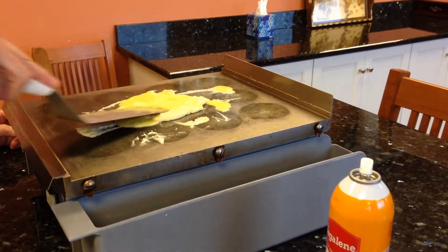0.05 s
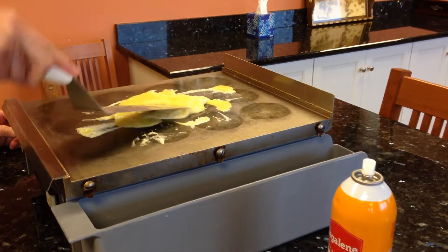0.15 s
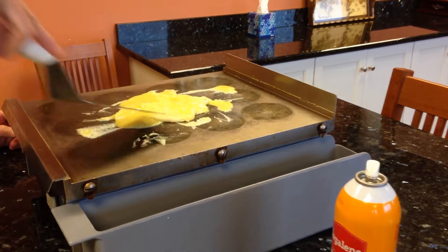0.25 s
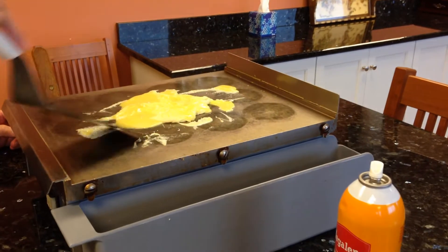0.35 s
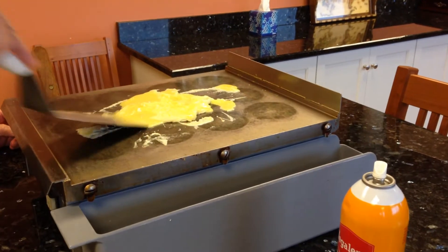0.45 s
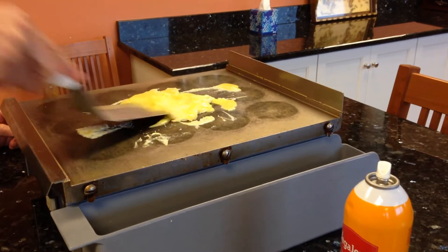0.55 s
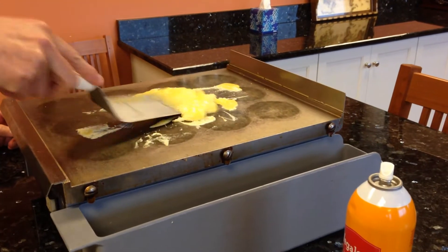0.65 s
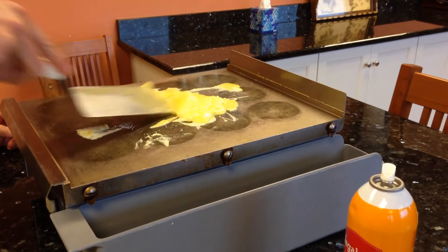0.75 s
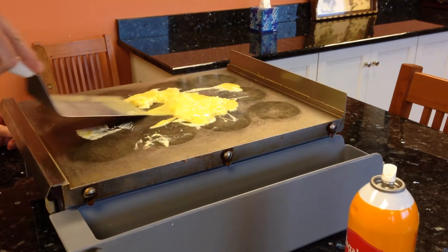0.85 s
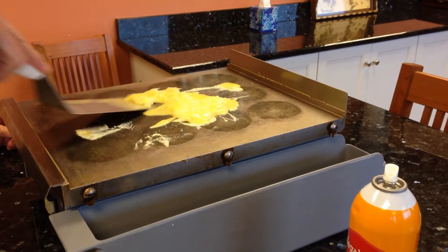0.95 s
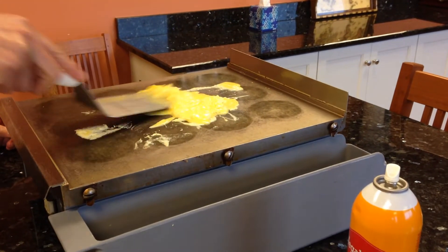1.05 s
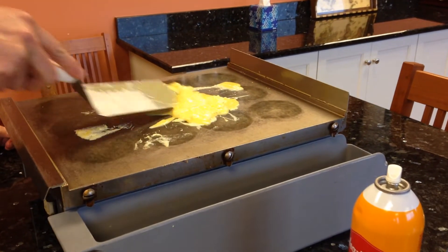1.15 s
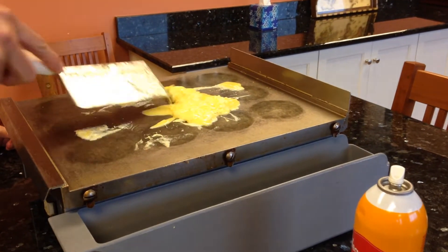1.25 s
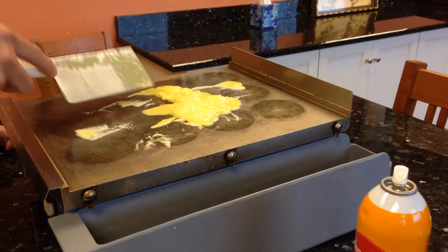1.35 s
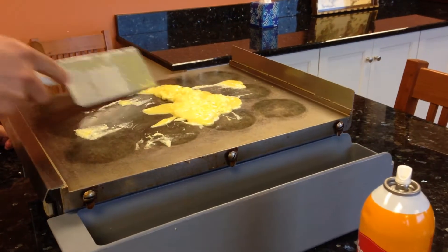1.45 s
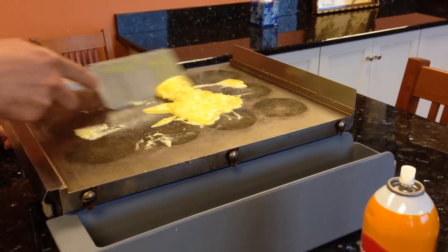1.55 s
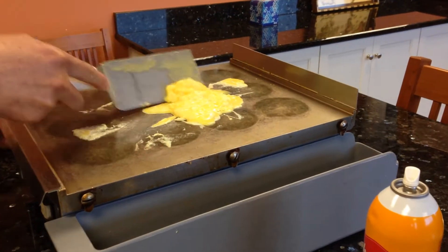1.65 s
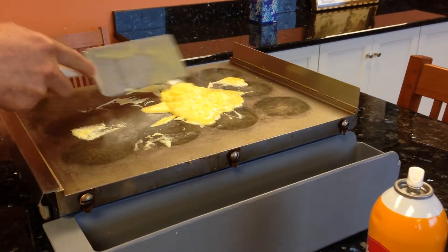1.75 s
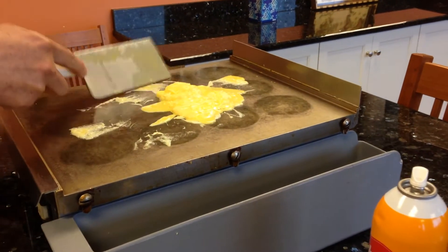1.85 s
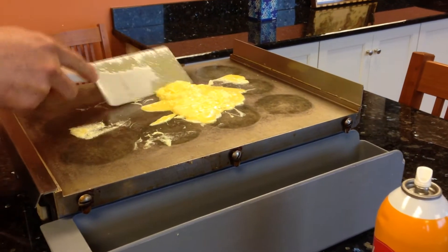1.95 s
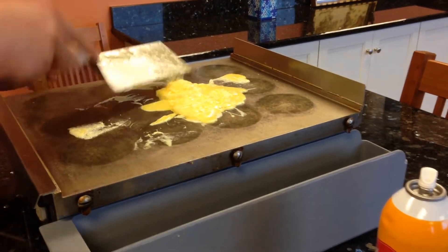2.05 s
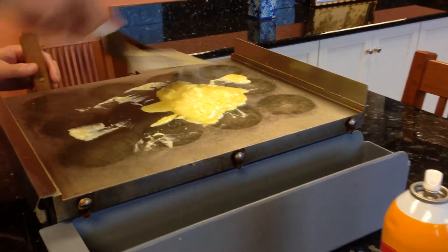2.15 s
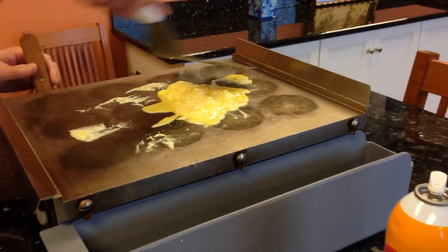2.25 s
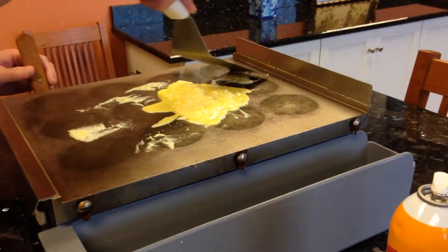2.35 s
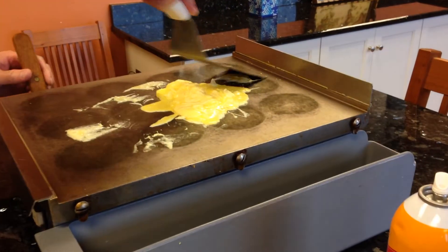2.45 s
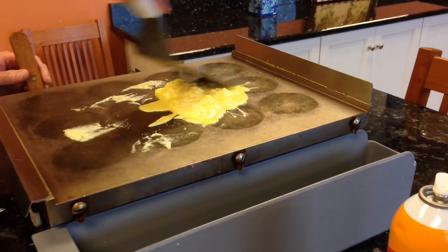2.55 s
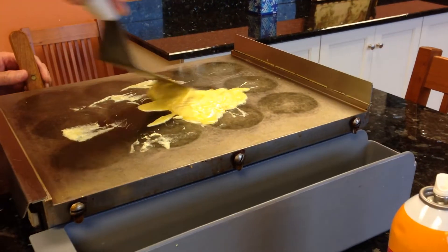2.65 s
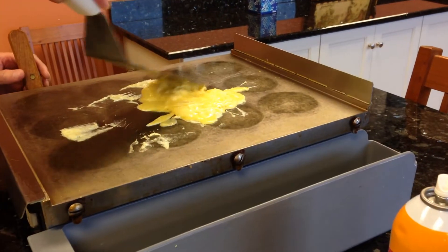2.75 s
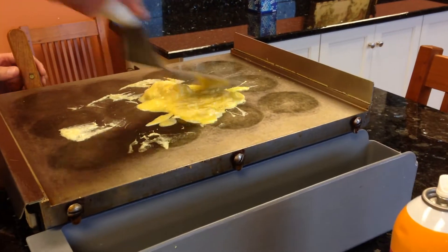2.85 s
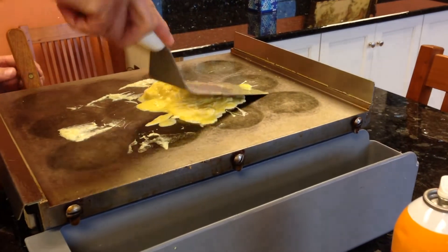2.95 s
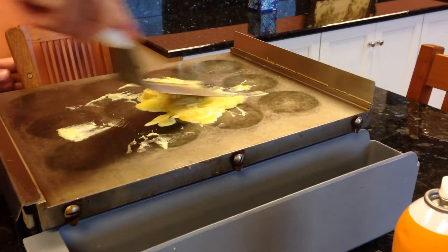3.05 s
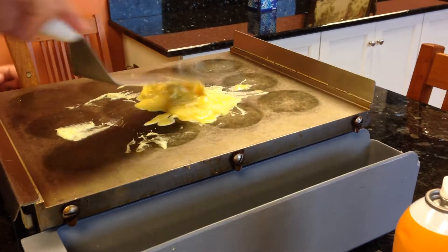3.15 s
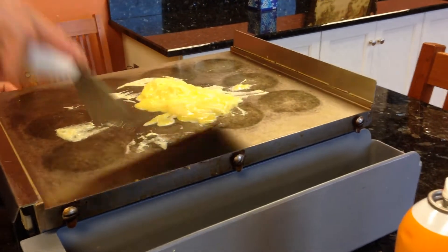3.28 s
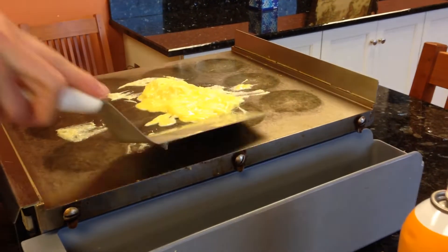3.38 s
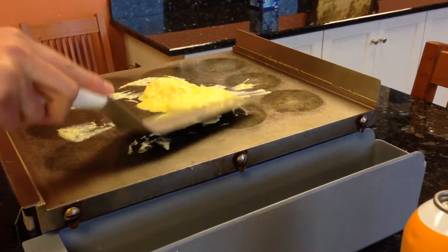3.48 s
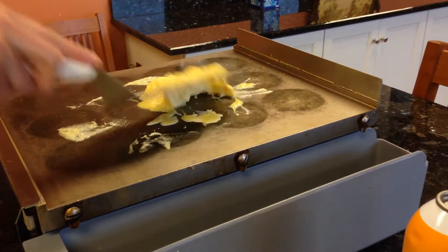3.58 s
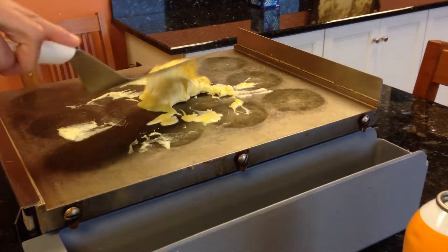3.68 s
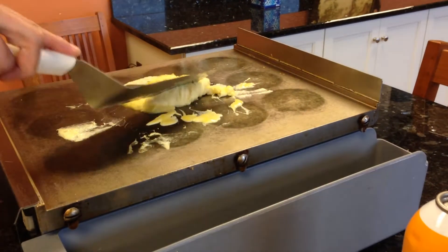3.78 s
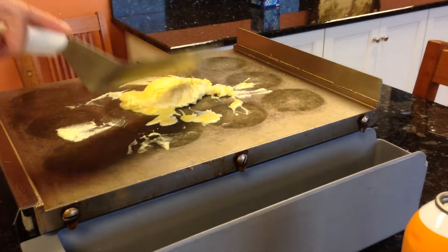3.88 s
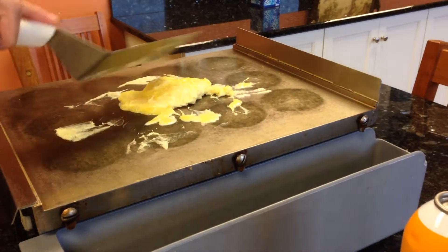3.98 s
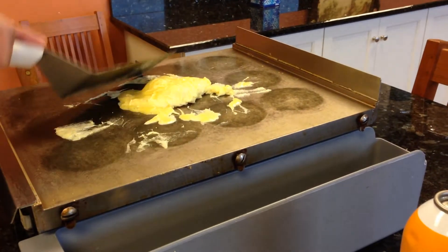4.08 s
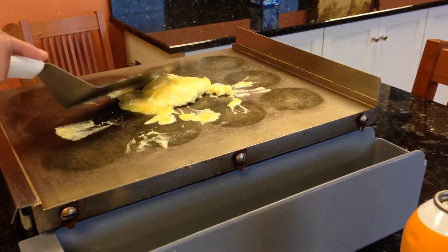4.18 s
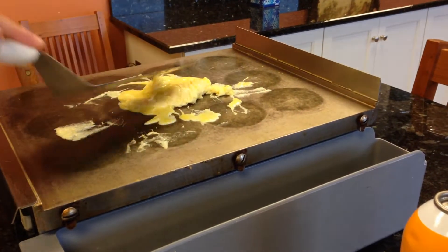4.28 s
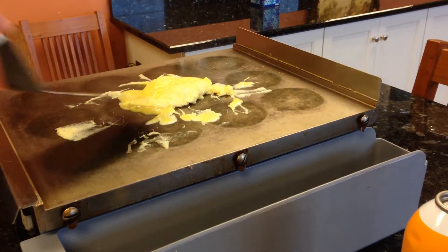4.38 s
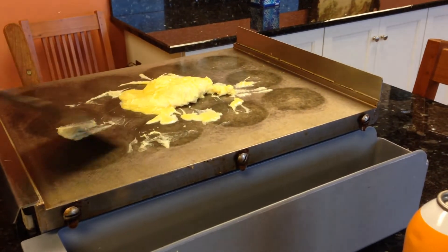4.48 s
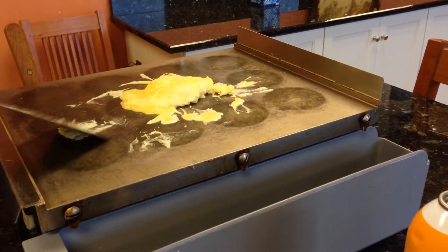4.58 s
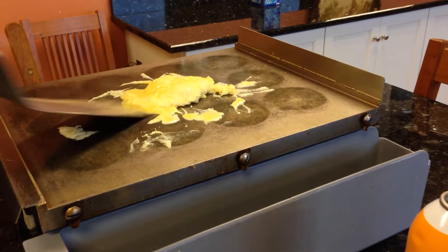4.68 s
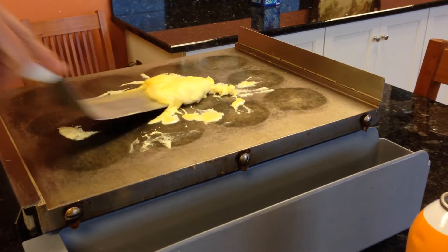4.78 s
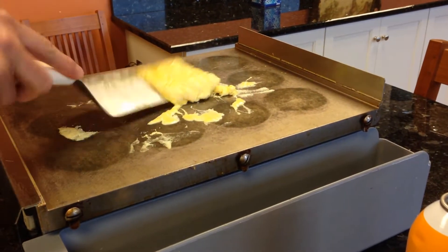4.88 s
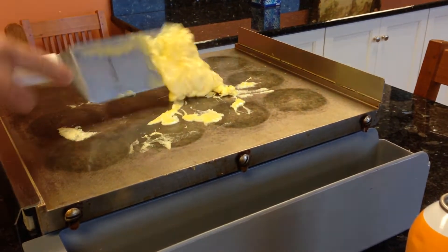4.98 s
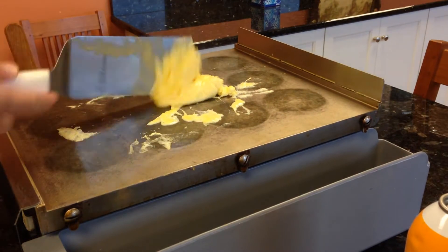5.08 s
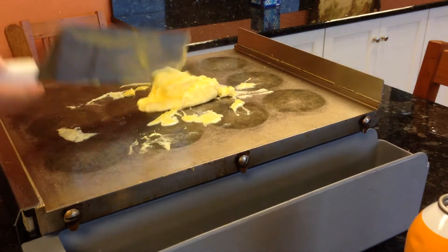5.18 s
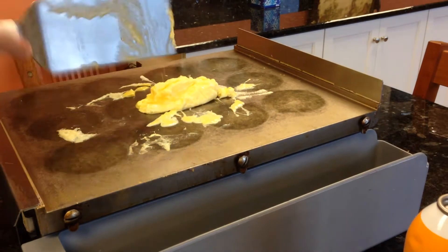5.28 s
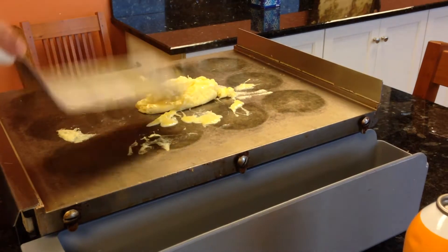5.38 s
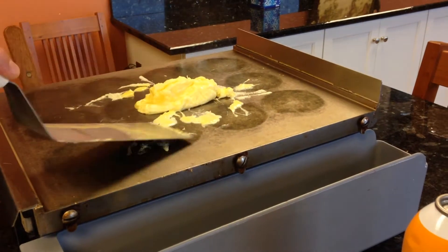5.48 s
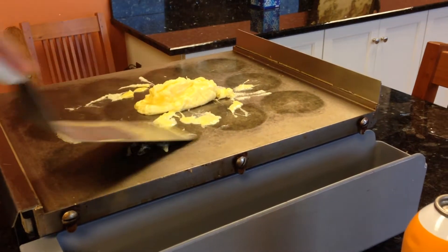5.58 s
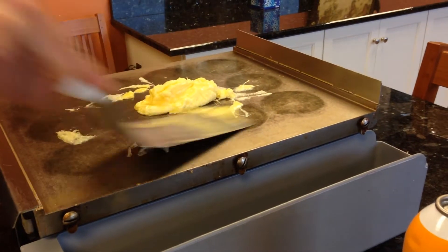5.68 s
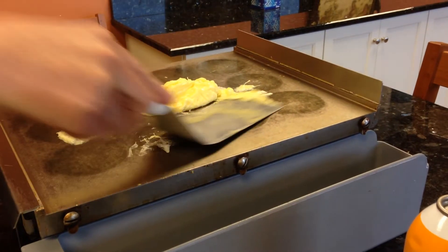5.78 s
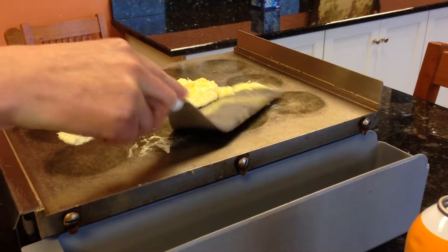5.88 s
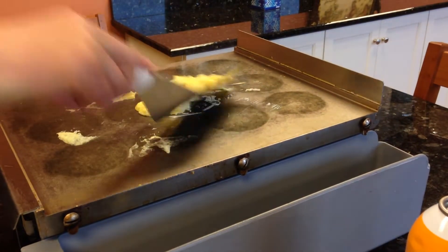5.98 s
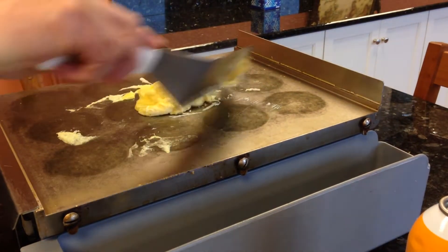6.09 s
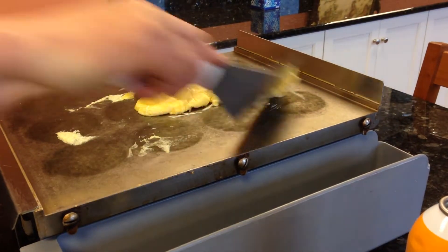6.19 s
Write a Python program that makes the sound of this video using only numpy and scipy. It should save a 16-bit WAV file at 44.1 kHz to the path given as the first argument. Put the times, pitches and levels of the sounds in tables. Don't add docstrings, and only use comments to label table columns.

```python
import sys
import numpy as np
from scipy import signal
from scipy.io import wavfile
from scipy.ndimage import uniform_filter1d

SR = 44100
rng = np.random.default_rng(int(sys.argv[2]) if len(sys.argv) > 2 else 0)


def output_pcm(signal):
    pcm = np.clip(np.atleast_2d(signal).T, -1, 1) * 32767
    wavfile.write(sys.argv[1], SR, np.round(pcm).astype(np.int16))


def amplitude_ratio(level_db):
    exponent = np.asarray(level_db, float) / 20
    return 10 ** exponent


N = 274743

BAND_EDGES_HZ = [2500, 7000]


def rms_one(x):
    return x / np.sqrt(np.mean(x ** 2) + 1e-20)


def band(x, low_hz, high_hz):
    return signal.sosfilt(signal.butter(2, [low_hz, min(high_hz, .45 * SR)], "band", fs=SR, output="sos"), x)


def drift(rate_hz, shape, part=slice(None)):
    rows, count = shape
    r = np.exp(-128 * np.pi * rate_hz / SR)
    noise = rng.standard_normal((rows, count // 64 + 602))
    slow = signal.lfilter([1], [1, -2 * r, r * r], noise)[:, 600:]
    slow *= np.sqrt((1 - r * r) ** 3 / (1 + r * r))
    at = np.arange(count)[part] / 64
    return np.array([np.interp(at, np.arange(len(v)), v) for v in slow])


def grains(per_s, spread_db, smooth):
    sizes = amplitude_ratio(spread_db * np.minimum(rng.exponential(1, N), 5)) * rng.choice([-1, 1], N)
    clicks = rms_one(sizes * (rng.random(N) < per_s / SR))
    return rms_one(clicks + smooth * rng.standard_normal(N))


def coloured(sources, spectrum):
    hz, db = np.transpose(spectrum)
    edges = np.geomspace(hz[0], hz[-1], round(3 * np.log2(hz[-1] / hz[0])) + 1)
    centres = np.sqrt(edges[1:] * edges[:-1])
    gains = amplitude_ratio(np.interp(np.log(centres), np.log(hz), db))
    bands = [gains[k] * band(sources[k % 2], edges[k], edges[k + 1]) for k in range(len(gains))]
    return centres, np.array(bands)


def rasping():
    # (frequency [Hz], level [dB per Hz])
    colour = [(530, -20), (900, -17.5), (1630, -17), (2860, -5), (3390, 5.5), (4790, 4), (10200, 6.5),
              (14700, 3), (15600, -12)]
    grit = [grains(5000, 2.0, smooth=0.31), grains(5000, 1.16, smooth=0.37)]
    rasp_hz, rasp = coloured(grit, colour)
    rasp = signal.sosfilt(signal.butter(4, 1050, "high", fs=SR, output="sos"), rasp)
    rasp_group = np.searchsorted(BAND_EDGES_HZ, rasp_hz)
    rasp /= np.array([np.std(rasp[rasp_group == g].sum(axis=0)) for g in rasp_group])[:, None]
    return grit, rasp, rasp_group


def scrape(contact, strokes, sings, lows_db, song, wander_db, least_hz, bend):
    drop_db, roundness = 20, 1.5
    lows_lag, lows_tilt = 0.23, 0.44
    grit, rasp, rasp_group = contact
    hz, width, db = np.repeat(np.array(song, float).T, 2, axis=1)
    hz[1::2] *= 1 + rng.uniform(.015, .04, len(song)) * rng.choice([-1, 1], len(song))
    db[1::2] -= 5.0
    group = np.searchsorted(BAND_EDGES_HZ, hz)
    power = amplitude_ratio(2 * db) * width
    weight = np.sqrt(power / [power[group == g].sum() for g in group])
    r = np.exp(-np.pi * np.clip(1.1 * width, least_hz + hz / 150, 600) / SR)
    mode_gain = np.sqrt(sings * (1 - r ** 2) ** 3) / 2 * weight
    out, reach = np.zeros(N + SR), SR // 4
    for s, peak_db, swell_s, fade_s, highs_db in strokes:
        at = round(s * SR)
        first = -min(round(1.5 * swell_s * SR), reach)
        last = min(round((1.5 * fade_s + .05) * SR), reach, N - at)
        span, part = slice(at + first, at + last), slice(reach + first, reach + last)
        t = np.arange(first, last) / SR
        spot = rng.integers(reach, N - reach)
        patch = slice(spot + first, spot + last)

        level_db = peak_db - drop_db * np.where(t < 0, -t / swell_s, t / fade_s) ** roundness
        bass_db = lows_db - lows_lag * np.maximum(level_db + 54.5, 0) - lows_tilt * highs_db
        judder_db = 1.37 * drift(79, (1, 2 * reach), part)
        push = amplitude_ratio(level_db + judder_db + [bass_db, 0 * t, highs_db + 0 * t])
        patches = amplitude_ratio(1.5 * drift(20, (len(rasp), 2 * reach), part))
        out[span] += np.sqrt(1 - sings) * np.sum(push[rasp_group] * patches * rasp[:, patch], axis=0)

        fed = amplitude_ratio(wander_db * drift(7.6, (len(hz), 2 * reach), part))
        fed_power = [np.sum((weight[:, None] * fed)[group == g] ** 2, axis=0) for g in range(3)]
        fed /= np.sqrt(np.array(fed_power) + 1e-9)[group]
        bent = np.minimum(hz * rng.normal(1, bend, len(hz)), 15300)
        for k in range(len(hz)):
            drive = grit[k % 2][patch] * push[group[k]] * fed[k] + 1e-18
            b = [1, 0.047, -0.74]
            a = [1, -2 * r[k] * np.cos(2 * np.pi * bent[k] / SR), r[k] ** 2]
            out[span] += mode_gain[k] * signal.lfilter(b, a, signal.lfilter(b, a, drive))
    return out[:N]


def landings(hits, modes, crack_s, bass_db):
    out, t = np.zeros(N), np.arange(SR // 2) / SR
    for s, crack_db, low_db, high_db, free_s in hits:
        ring_db = [low_db + bass_db, low_db, high_db]
        crack = band(band(rng.standard_normal(len(t)), 620, 11200), 600, 13500)
        sound = 0.55 * crack * amplitude_ratio(-60 * t / crack_s)
        pressed = amplitude_ratio(-700 * np.maximum(t - free_s, 0)) * np.minimum(t / 0.0016, 1)
        looseness = free_s / .125
        for hz, db, t60 in modes:
            luck_db, bend, phase = rng.normal(0, 1), rng.normal(1, .002), rng.uniform(0, 2 * np.pi)
            strength = amplitude_ratio(db + ring_db[np.searchsorted([1300, 2000], hz)] + luck_db)
            decay = amplitude_ratio(-60 * t / (t60 * looseness)) * pressed
            sound += strength * decay * np.sin(2 * np.pi * hz * bend * t + phase)
        at = round(s * SR)
        out[at:at + len(t)] += amplitude_ratio(crack_db) * sound[:N - at]
    return out


def puffs(events, spread, attack_s=0.0006):
    out, t = np.zeros(N), np.arange(SR // 4) / SR
    for s, db, hz, t60 in events:
        burst = rms_one(band(rng.standard_normal(len(t)), hz / spread, hz * spread))
        envelope = .5 * amplitude_ratio(db - 60 * t / t60) * np.minimum(t / attack_s, 1)
        at = round(s * SR)
        out[at:at + len(t)] += (envelope * burst)[:N - at]
    return out


def flat_blade(contact):
    # (time of most force [s], rubbing [dB], swell [s], fade [s], brightness [dB])
    strokes = [(0.16, -50, 0.105, 0.019, -4.5), (0.484, -36.5, 0.017, .08, 2.5),
               (0.54, -31.5, 0.085, .11, 2), (0.641, -43, 0.05, 0.042, -18), (1.046, -45.5, 0.1, 0.09, 5.5),
               (1.111, -47, 0.045, 0.062, -10), (1.652, -45.5, 0.068, 0.045, 7.5),
               (2.524, -33.5, .04, 0.2, 2), (2.638, -30.5, 0.11, 0.03, 3),
               (2.718, -48.5, 0.038, 0.0078, 6.5), (3.062, -28, 0.037, 0.016, -4),
               (3.096, -39.5, 0.055, 0.03, 5), (3.52, -42, 0.15, 0.069, -1.5),
               (3.839, -59.5, 0.51, 0.35, -0.5), (4.228, -40.5, 0.047, 0.053, 5.5),
               (4.269, -32.5, 0.032, 0.013, 0.5), (4.689, -33.5, 0.058, .1, 1),
               (4.769, -31.5, 0.069, 0.074, 4.5), (4.857, -38.5, 0.051, 0.037, 4),
               (5.691, -45, 0.076, 0.05, -8.5), (5.755, -36, .09, 0.078, 8.5), (5.82, -44, 0.021, 0.076, 5),
               (5.989, -46, 0.12, 0.039, 1.5), (6.036, -41.5, 0.047, 0.017, 4.5)]
    # (time [s], rubbing [dB], fade [s], brightness [dB])
    skids = [
        (0.083, -45, 0.088, -6.5),
        (0.404, -40.5, 0.034, 0.5),
        (2.405, -35.5, 0.027, 1),
        (2.966, -27, 0.047, -2),
        (4.143, -40, 0.027, 3.5),
        (4.572, -54.5, 0.086, -2),
        (5.137, -39, 0.033, -23.5),
        (5.522, -41.5, 0.029, 0.5),
    ]
    # (frequency [Hz], width [Hz], level [dB])
    song = [(1219, 14.5, 3), (1502, 33, 8), (1695, 21, 9.5), (2474, 66, 5), (3320, 23, -21), (3918, 180, 1),
            (4560, 510, 6.5), (5050, 42, 12), (5694, 370, 3), (6840, 66, 6), (7260, 61, 6), (8000, 33, 1),
            (8440, 910, 4), (9290, 73, 6.5), (10000, 300, 8.5), (10740, 150, -7.5), (12100, 14, -32),
            (12700, 44, -26), (14300, 130, -19), (13160, 51, -5), (15000, 170, -27)]
    # (time [s], crack [dB], ring under 2 kHz [dB re crack], above [dB re crack], time free [s])
    hits = [
        (0.0818, -33, -6.5, 2, 0.043),
        (0.403, -32, -6.5, -28, 0.22),
        (2.4041, -28, -12.5, -9.5, 0.25),
    ]
    chops = [
        (2.9655, -12.5, -21, -10, 0.075),
        (2.9719, -14, -4, -2, 0.061),
    ]
    # (frequency [Hz], level [dB], t60 [s])
    ring = [(498, -22, 0.27), (864, -16.5, 0.23), (1214, -6, 0.18), (1500, -12.5, 0.23), (1780, -10, 0.15),
            (2260, -20, 0.39), (2996, -20, 0.41), (3450, -10, 0.12), (3620, -35, 0.12)]
    touches = [(s, db, .002, fade_s, highs_db) for s, db, fade_s, highs_db in skids]
    sound = scrape(contact, strokes, 0.53, -8.0, song, wander_db=8.0, least_hz=48.6, bend=0.016)
    sound += scrape(contact, touches, 0.3, -3.9, song, wander_db=5, least_hz=40.6, bend=0.017)
    sound += landings(hits, ring, crack_s=0.012, bass_db=-1.5)
    return sound + landings(chops, ring, crack_s=0.0072, bass_db=-20.0)


def edge_blade(contact):
    # (time of most force [s], rubbing [dB], swell [s], fade [s], brightness [dB])
    strokes = [
        (1.523, -33, 0.0035, 0.066, -1.5),
        (1.549, -40, 0.013, 0.12, 6.5),
        (1.917, -41, 0.0024, 0.085, 13),
        (1.975, -40, 0.055, 0.069, 9.5),
    ]
    # (frequency [Hz], width [Hz], level [dB])
    song = [(858, 18, -11), (1217, 58, -1), (1387, 22.6, -2), (1737, 47, -5), (1920, 25, 0), (2370, 30, -4),
            (2420, 28, 7.5), (3785, 54, -6.5), (3700, 29, -17), (4160, 28, -9), (4340, 77, -6),
            (4770, 30, -8), (5060, 48, -21), (5350, 34, -5), (5800, 27, -17), (6020, 45, -6),
            (6530, 190, -8), (7400, 20, -17), (7570, 50, 0), (8460, 41, -8), (8730, 34, 6.5),
            (8800, 66, -12), (9560, 140, -7.5), (10520, 190, -4), (10900, 130, -14), (10860, 160, -7),
            (12530, 250, -3), (13400, 56, -4), (13800, 19, -13), (14800, 62, 5.5)]
    # (time [s], crack [dB], ring under 2 kHz [dB re crack], above [dB re crack], time free [s])
    hits = [
        (0.848, -44, -17, -24, 0.21),
        (1.5224, -27.5, -14.5, -14, 0.087),
        (1.917, -23, -15, -13.5, 0.12),
    ]
    # (frequency [Hz], level [dB], t60 [s])
    ring = [(502, -7, 0.36), (867, -1.5, 0.73), (1209, 3.5, 0.11), (1465, -10.5, 0.78), (2347, -8, 0.35),
            (2460, -9, 0.17), (3750, -5, 0.32), (3900, 0.5, 0.12), (4420, -4.5, 0.42), (5230, -15, 0.39)]
    sound = scrape(contact, strokes, 0.88, -5.0, song, wander_db=7.5, least_hz=22.3, bend=0.0012)
    return sound + landings(hits, ring, crack_s=0.1, bass_db=-7.5)


def loose_blade(contact):
    # (time of most force [s], rubbing [dB], swell [s], fade [s], brightness [dB])
    strokes = [
        (0.851, -43, 0.0034, 0.099, 2),
        (0.885, -40.5, 0.043, 0.082, -3),
        (0.991, -50.5, .07, 0.066, -11),
        (2.437, -37, 0.036, 0.019, -5),
        (3.37, -29.5, 0.0033, 0.015, 3.5),
        (3.438, -32, 0.067, 0.043, -5.5),
    ]
    # (frequency [Hz], width [Hz], level [dB])
    song = [(1226, 20, -10.5), (1450, 18, -10), (1810, 16, -2.5), (1944, 24, -5), (4800, 26, 2),
            (5400, 27, -7), (2304, 26, -2), (2620, 25, -1), (2940, 35, 1.5), (3700, 23, -17), (3743, 49, 5),
            (4730, 37, 9.5), (5670, 160, 5.5), (6320, 49, 1), (6690, 56, 8), (7500, 25, -13),
            (7500, 43, -5.5), (8240, 33, 1), (8780, 29, -8), (8600, 40, -5), (9200, 47, -35),
            (9800, 440, -15), (10300, 32, -2), (11400, 49, -8), (12000, 190, -37), (12500, 100, -23),
            (13500, 55, -27), (14100, 49, -22), (14800, 50, -34), (15200, 130, -28)]
    # (time [s], crack [dB], ring under 2 kHz [dB re crack], above [dB re crack], time free [s])
    hits = [
        (3.3671, -17, -13.5, -13, 0.11),
        (4.1409, -22.5, -16, -20, 0.067),
        (5.5214, -21, -18, -9.5, 0.051),
    ]
    # (frequency [Hz], level [dB], t60 [s])
    ring = [(496, -10.5, 0.42), (845.2, -5, 0.33), (1190, 1, 0.33), (1456, -3.5, 0.92), (1730, -4.5, 0.99),
            (2275, -3.5, 0.23), (3030, -9, 0.27), (3440, -12, .25), (3820, -21, .2)]
    sound = scrape(contact, strokes, 0.97, -11.0, song, wander_db=-2.5, least_hz=23.7, bend=0.0019)
    return sound + landings(hits, ring, crack_s=0.049, bass_db=-2.0)


def corner_squeaks():
    # (time [s], level [dB], pitch [Hz], t60 [s])
    squeaks = [
        (0.1037, -28, 2820, 0.071),
        (1.1687, -47, 1300, 0.053),
        (3.048, -25, 2170, 0.056),
        (3.54, -34.5, 1600, 0.1),
    ]
    return puffs(squeaks, spread=1.04)


def griddle_plate():
    # (time [s], crack [dB], ring under 2 kHz [dB re crack], above [dB re crack], time free [s])
    drops = [
        (5.1367, -21, -20.5, -4, 0.1),
    ]
    # (frequency [Hz], level [dB], t60 [s])
    ring = [(797, -0.5, 0.2), (897, 3, 0.089), (1010, 3, 0.074), (1740, 2, 0.044), (2510, -12, 0.08),
            (3240, 2, 0.036), (3350, -21, 0.025)]
    # (time [s], level [dB])
    bodies = [
        (1.521, -53),
        (1.916, -46),
        (2.295, -41.5),
        (2.968, -41.5),
        (3.368, -37),
        (5.141, -35.5),
    ]
    sound = landings(drops, ring, crack_s=0.028, bass_db=7.0)
    return sound + puffs([(s, db, 306, 0.12) for s, db in bodies], spread=1.63)


def fat_ticks():
    # (time [s], level [dB], pitch [Hz], t60 [s])
    ticks = [
        (1.279, -43, 1570, 0.022),
        (1.4476, -46, 1480, 0.024),
        (2.232, -42, 7500, 0.011),
        (3.834, -39, 9400, 0.03),
        (3.7748, -36.5, 3100, 0.023),
        (3.8344, -42, 1610, 0.028),
        (3.8741, -43, 3610, 0.026),
        (4.571, -44, 4070, 0.049),
        (5.6201, -42, 3750, 0.024),
    ]
    return puffs(ticks, spread=1.23)


def wooden_knocks():
    # (time [s], level [dB], pitch [Hz])
    knocks = [
        (2.152, -50, 646),
        (2.293, -34.5, 605),
        (2.335, -41, 583),
        (2.741, -44, 610),
        (2.783, -51, 620),
    ]
    return puffs([(*row, 0.11) for row in knocks], spread=1.104, attack_s=0.0063)


def kitchen(x, t60, wet_db):
    t = np.arange(SR // 2) / SR
    tail = band(rng.standard_normal(len(t)), 190, 12000) * amplitude_ratio(-60 * t / t60) * (t > .004)
    return x + amplitude_ratio(wet_db) * signal.fftconvolve(x, tail / np.sqrt(np.sum(tail ** 2)))[:N]


def sizzle():
    # (frequency [Hz], level [dB per Hz])
    colour = [(150, 15), (250, -17), (302, -33), (318, -9), (398, -3.5), (465, -8), (506, -3.5), (561, -9),
              (1910, -7), (2510, -12), (3250, -6.5), (8230, -9.5), (15300, -17)]
    hz, pops = coloured([grains(4000, 7.9, smooth=1.23), grains(4000, 1.9, smooth=1.5)], colour)
    hiss = np.sum(pops * amplitude_ratio(.9 * drift(8, (len(hz), N))), axis=0)
    return amplitude_ratio(-58) * rms_one(hiss)


def thuds():
    # (time [s], level [dB], pitch [Hz])
    steps = [(0.238, -35.5, 88), (0.273, -35, 112), (0.341, -42, 82), (0.62, -63, 123), (0.697, -47, 107),
             (0.798, -43, 110), (0.877, -42, 65.4), (2.201, -37.5, 108), (2.223, -35.5, 104),
             (3.269, -36.5, 90), (3.301, -33, 99), (3.327, -33.5, 94), (3.363, -30.5, 118), (3.55, -52, 99),
             (3.617, -43, 108), (3.719, -44, 131), (5.258, -42, 103), (5.309, -46, 65), (5.352, -43, 77)]
    out, t = np.zeros(N), np.arange(SR // 3) / SR
    for s, db, hz in steps:
        turns = hz * (t + 0.0019 * (1 - np.exp(-t / 0.029)))
        envelope = amplitude_ratio(db - 60 * t / .1) * (1 - np.exp(-t / 0.0023))
        at = round(s * SR)
        out[at:at + len(t)] += (envelope * np.sin(2 * np.pi * turns))[:N - at]
    return out


def rumble():
    # (time [s], level [dB])
    course = [(0.0, -65.5), (0.71, -57.5), (1.47, -68.5), (2.34, -59), (2.9, -63), (3.52, -52),
              (3.82, -64.5), (4.51, -69), (5.34, -62), (6.23, -70.5)]
    # (frequency [Hz], level [dB rms])
    lines = [(70.0, -73.5), (231.5, -70), (296.1, -76.5)]
    t = np.arange(N) / SR
    low_db = np.interp(t, *np.transpose(course))
    deep = rms_one(band(rng.standard_normal(N), 50, 131))
    upper = rms_one(band(rng.standard_normal(N), 79, 345))
    hum = sum(np.sqrt(2) * amplitude_ratio(db) * np.sin(2 * np.pi * hz * t) for hz, db in lines)
    return amplitude_ratio(low_db + 3.9 * drift(9.8, (1, N))[0]) * deep + amplitude_ratio(-67.0) * upper + hum


def scene():
    contact = rasping()
    blade = flat_blade(contact) + edge_blade(contact) + loose_blade(contact) + corner_squeaks()
    near = blade + griddle_plate() + fat_ticks() + wooden_knocks()
    return (kitchen(near, t60=0.32, wet_db=-16.0) + sizzle() + rumble() + thuds())[None]


def low_pass(x):
    return signal.sosfilt(signal.butter(12, 16480, fs=SR, output="sos"), x)


def record(dry):
    cutoff_hz = 15350
    kept = signal.sosfilt(signal.ellip(12, .5, 75, cutoff_hz, fs=SR, output="sos"), dry)
    top = signal.sosfilt(signal.butter(8, [cutoff_hz, 16500], "band", fs=SR, output="sos"), dry)
    power = uniform_filter1d(top ** 2, size=256)
    sudden = uniform_filter1d(1. * (power > 60 * np.roll(power, 512)), size=256)
    return low_pass(kept + amplitude_ratio(-20) * sudden * top)


dry = scene()
out = record(dry)
output_pcm(out)
```